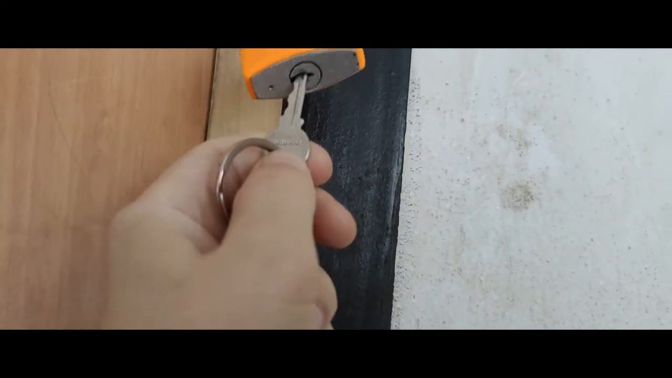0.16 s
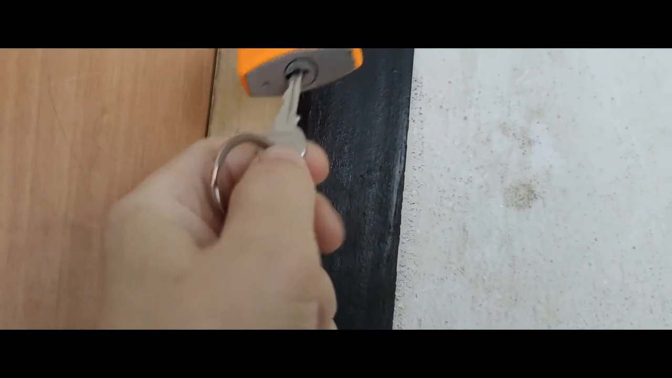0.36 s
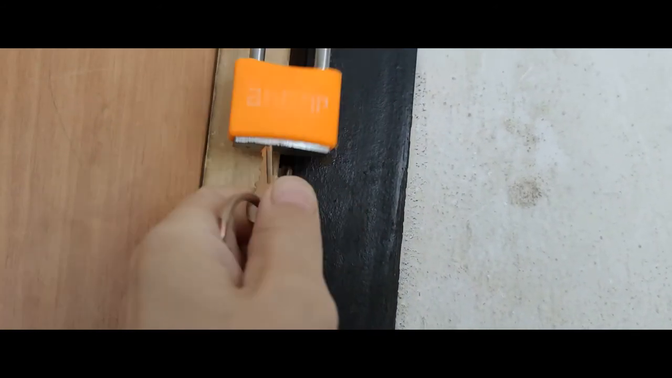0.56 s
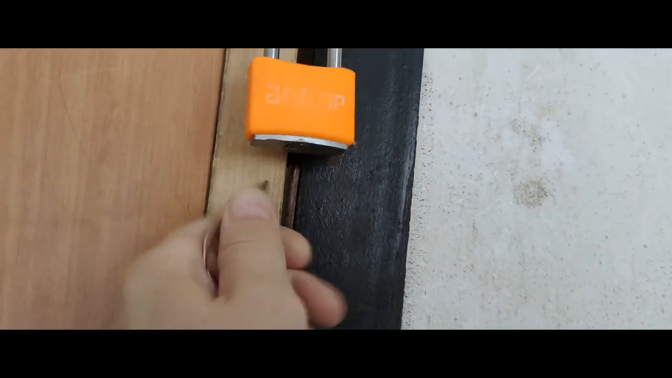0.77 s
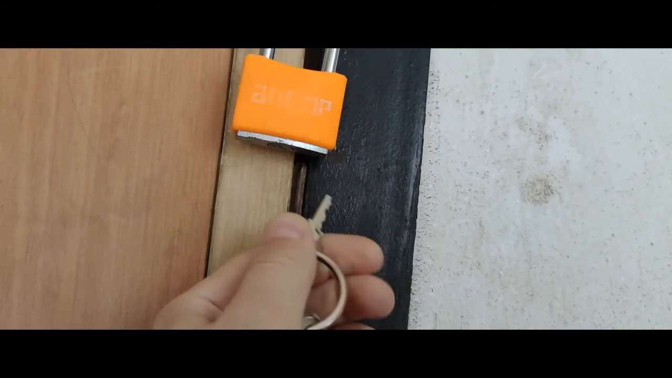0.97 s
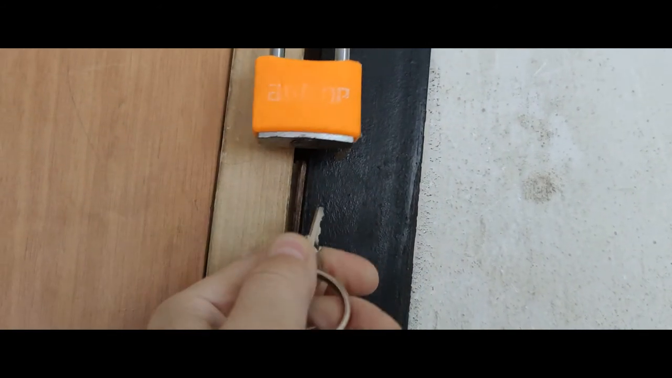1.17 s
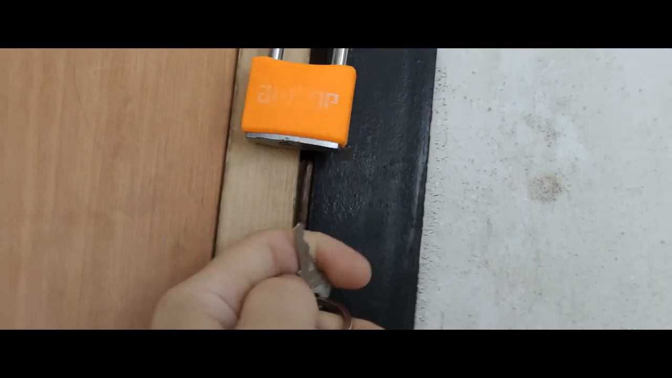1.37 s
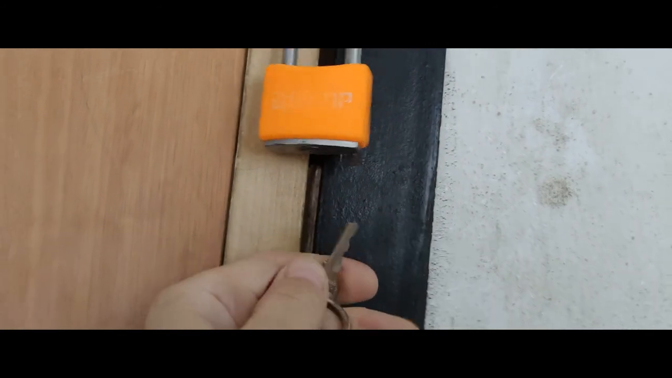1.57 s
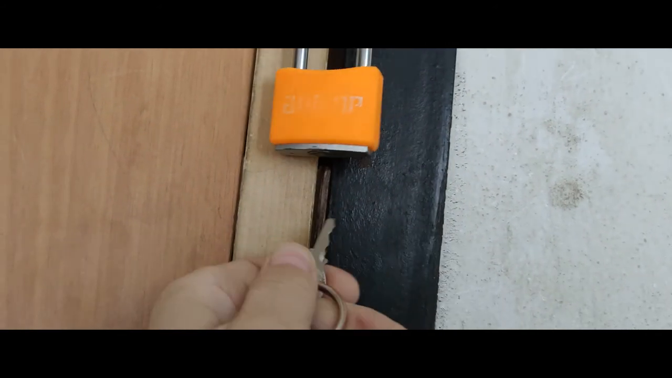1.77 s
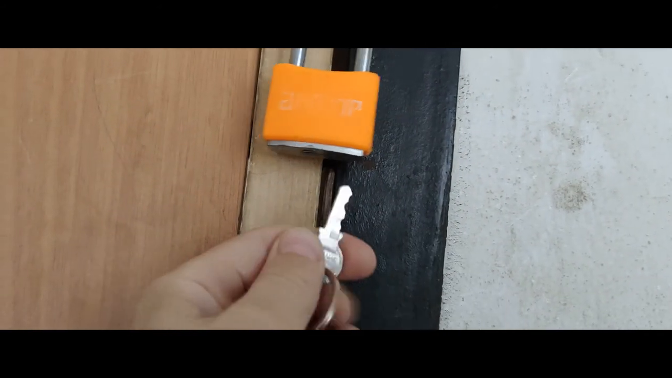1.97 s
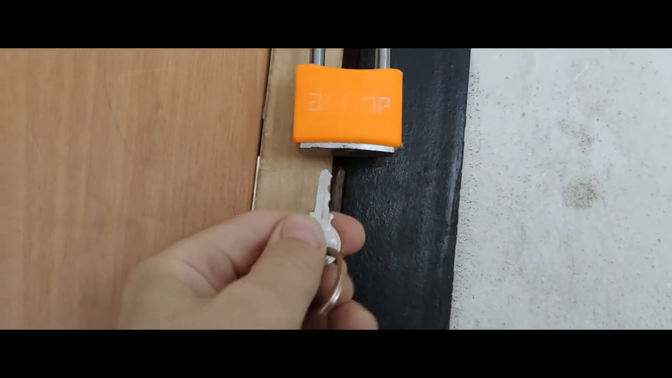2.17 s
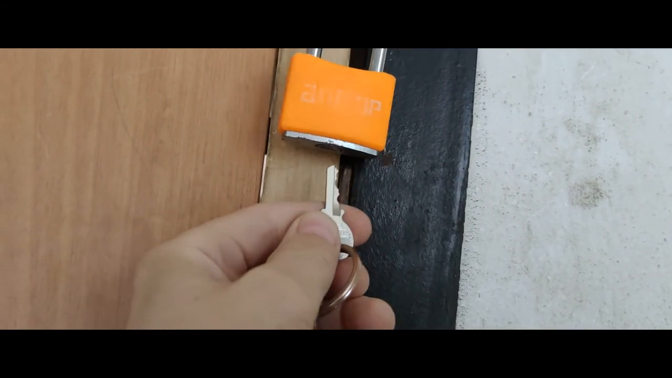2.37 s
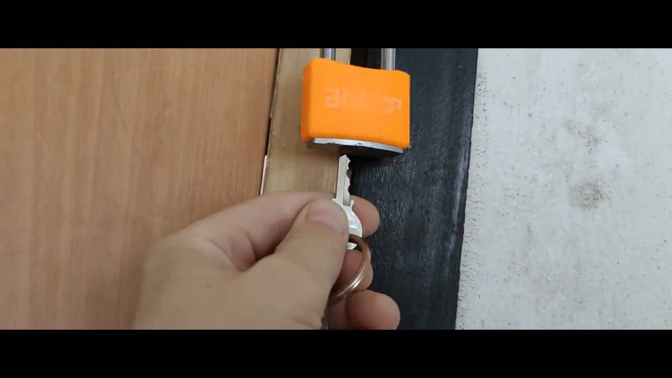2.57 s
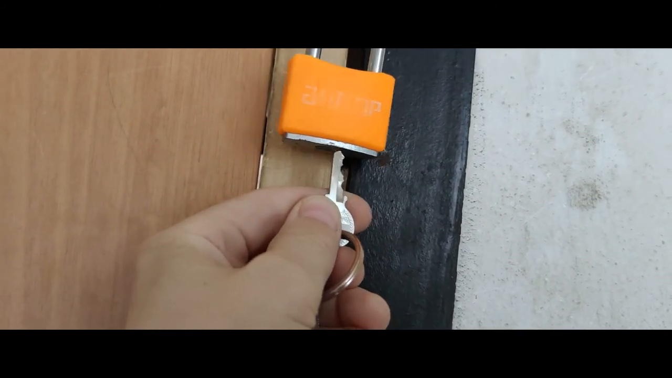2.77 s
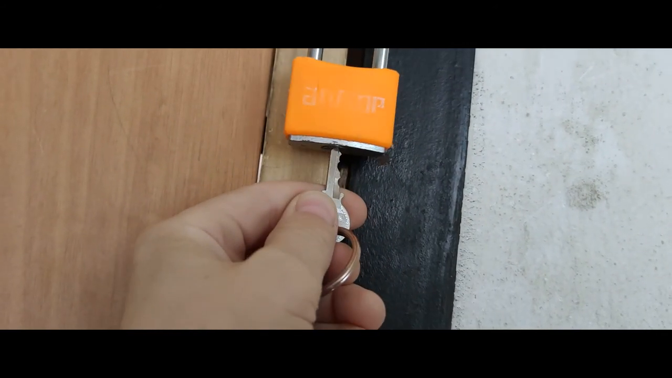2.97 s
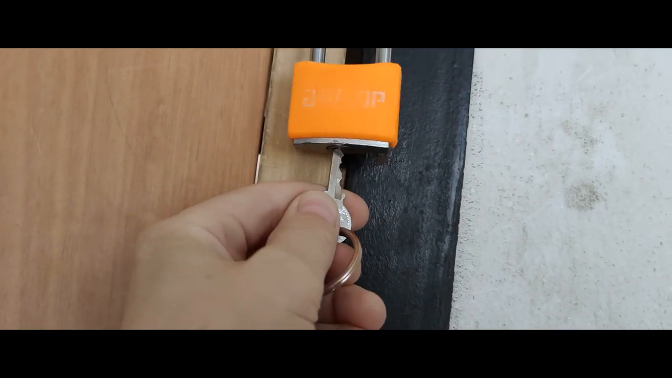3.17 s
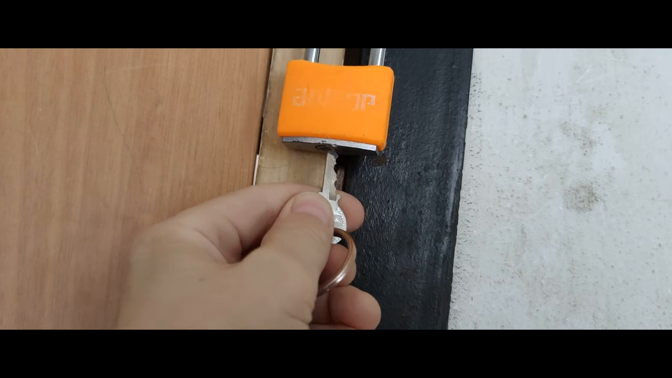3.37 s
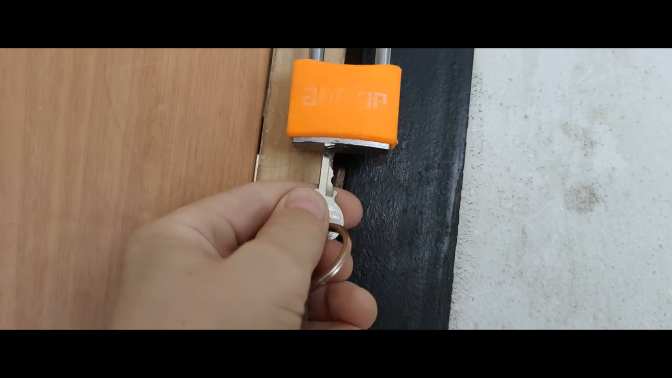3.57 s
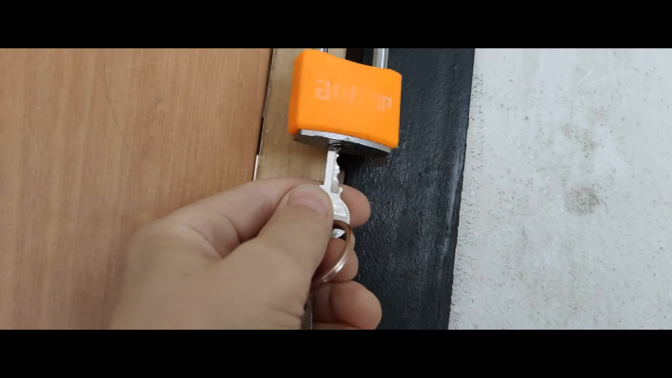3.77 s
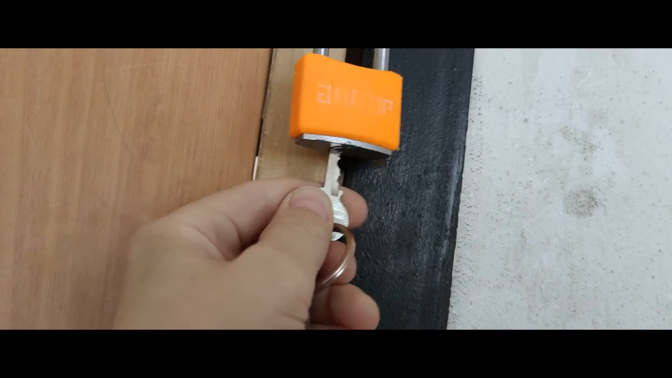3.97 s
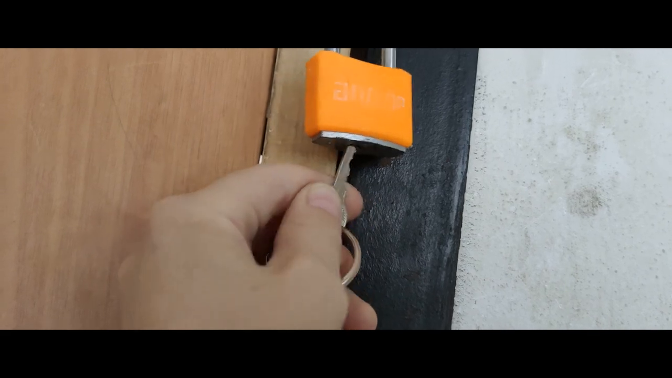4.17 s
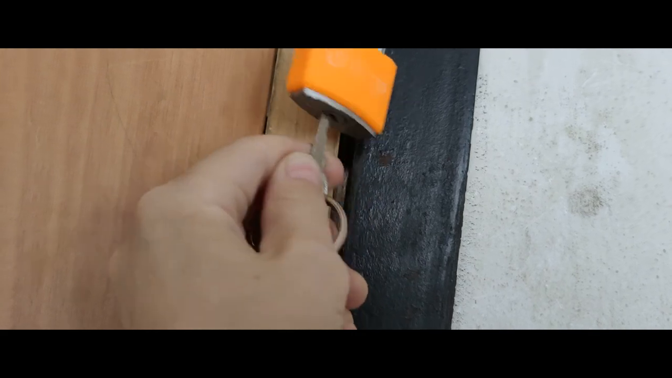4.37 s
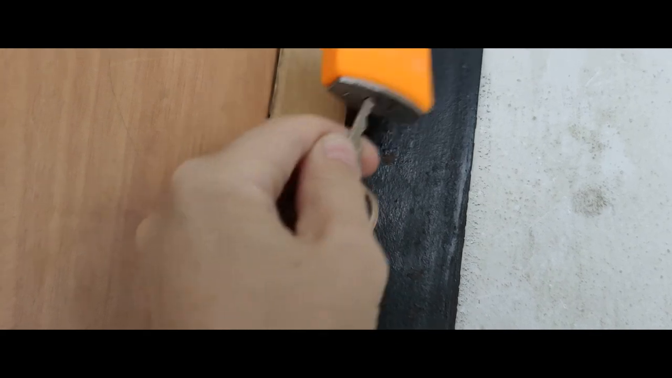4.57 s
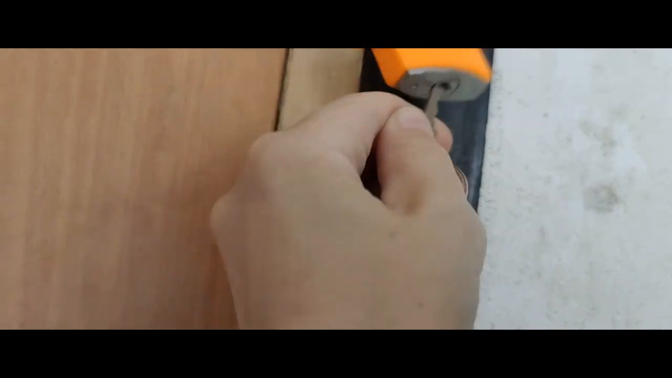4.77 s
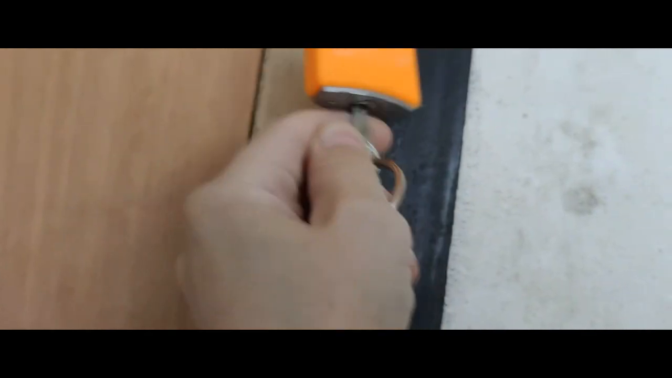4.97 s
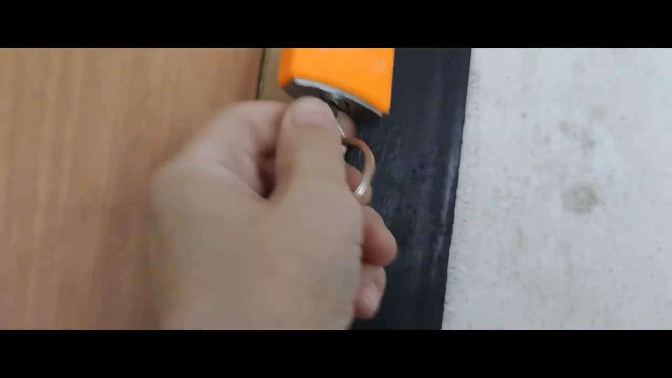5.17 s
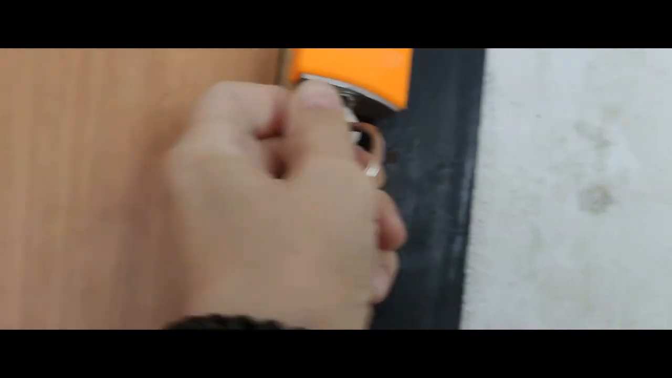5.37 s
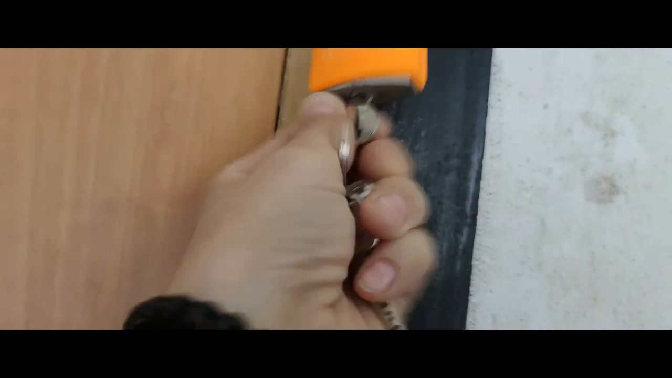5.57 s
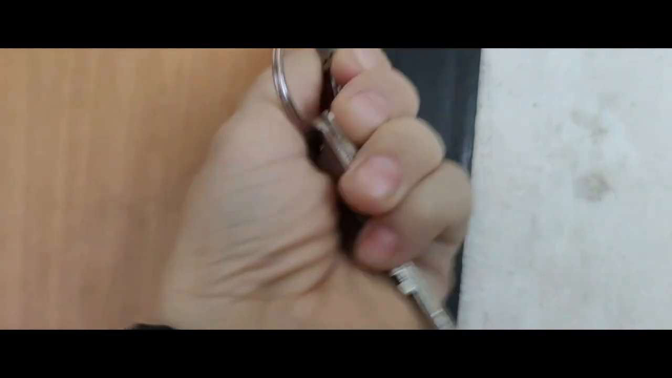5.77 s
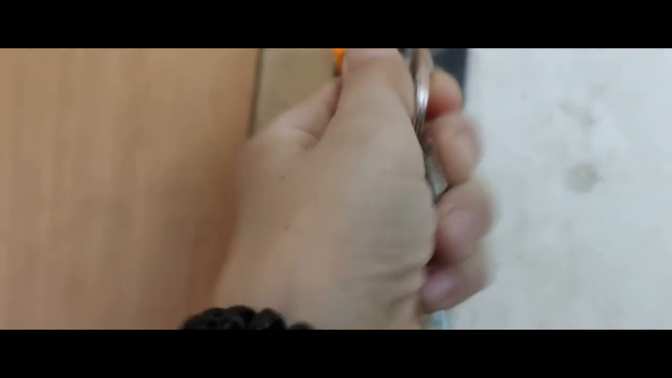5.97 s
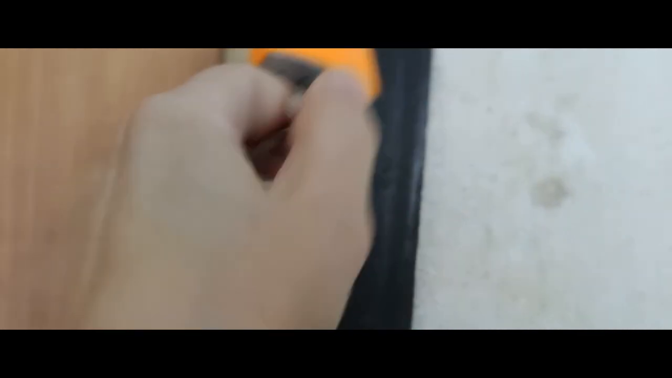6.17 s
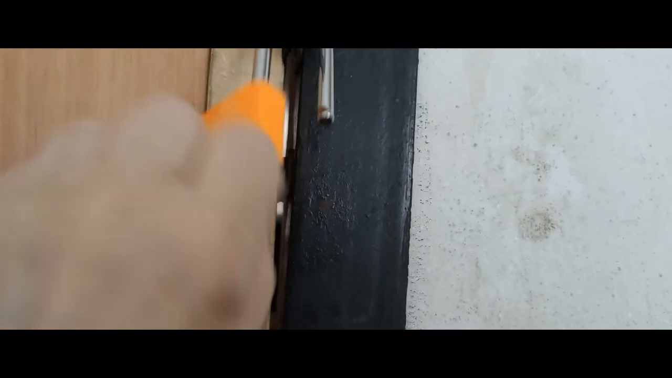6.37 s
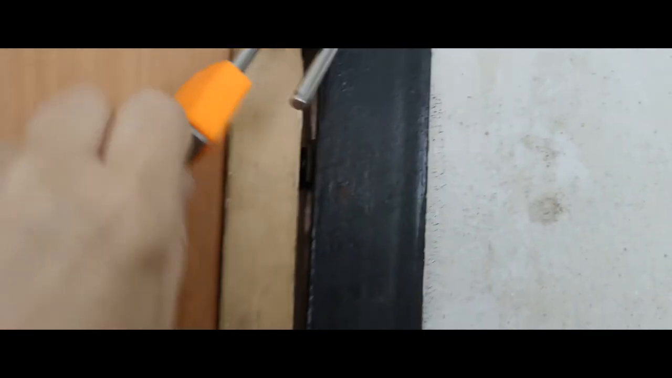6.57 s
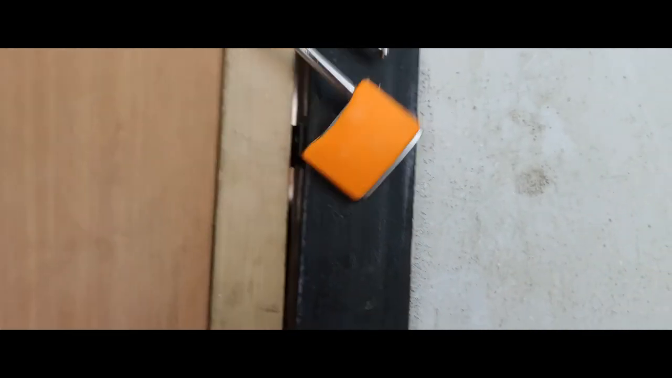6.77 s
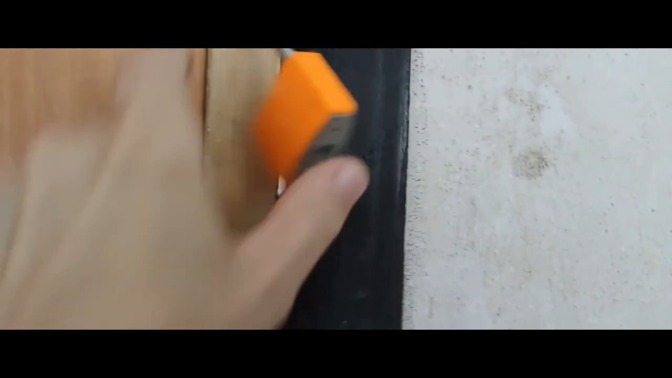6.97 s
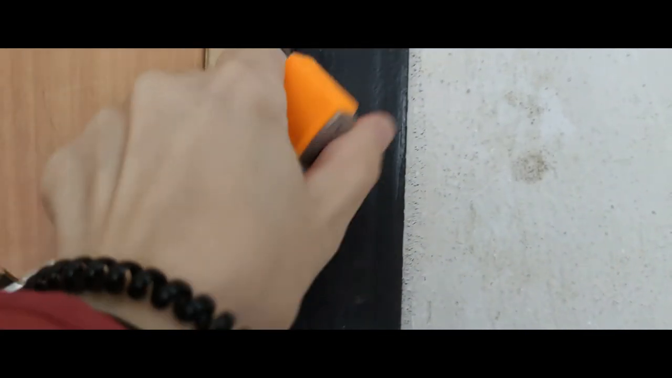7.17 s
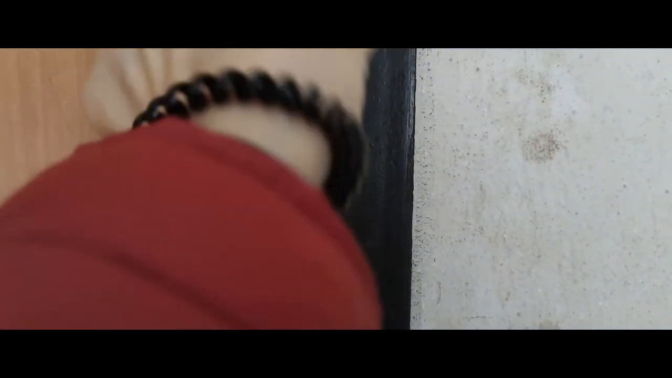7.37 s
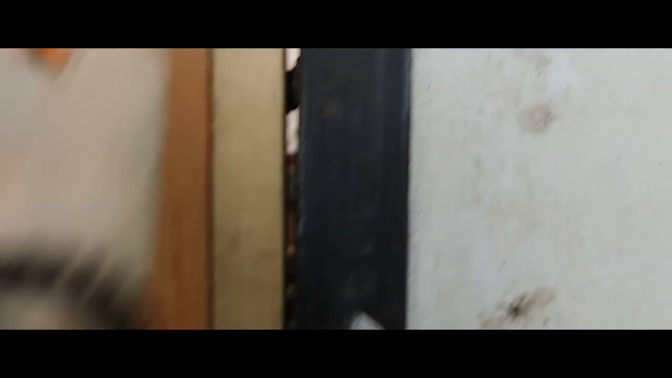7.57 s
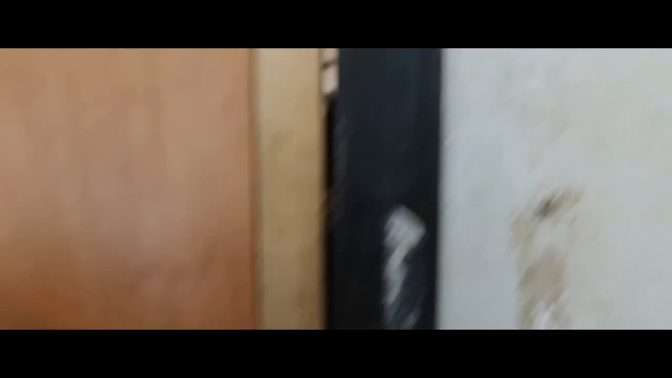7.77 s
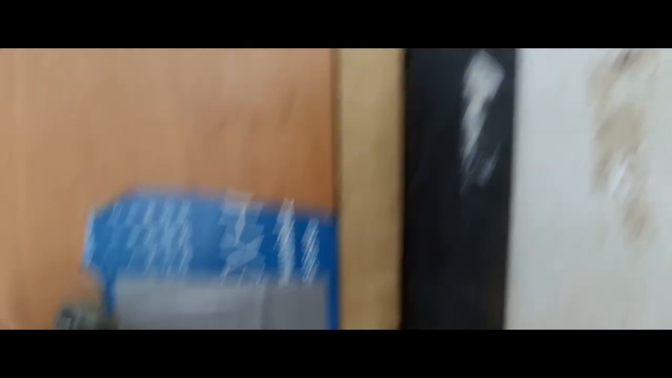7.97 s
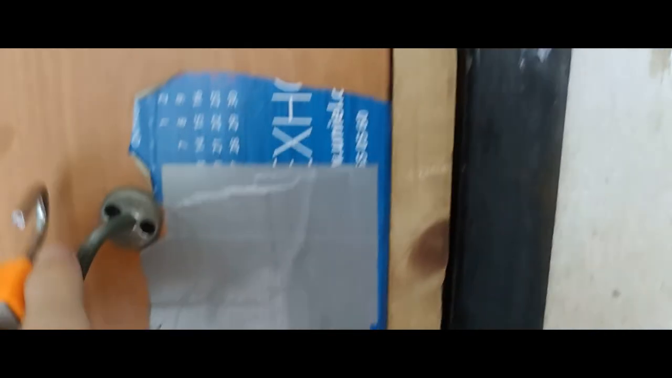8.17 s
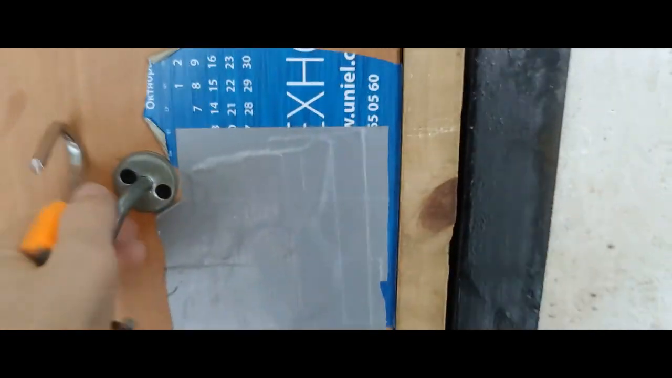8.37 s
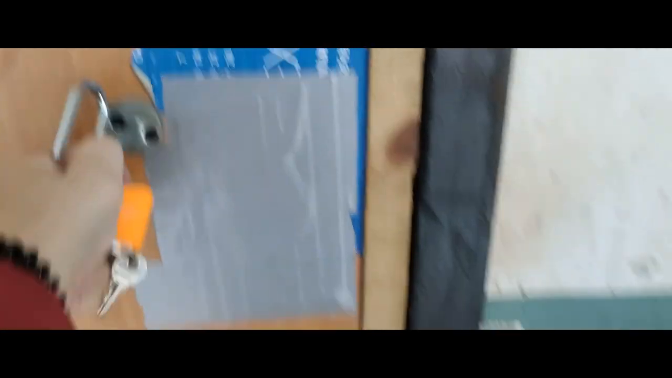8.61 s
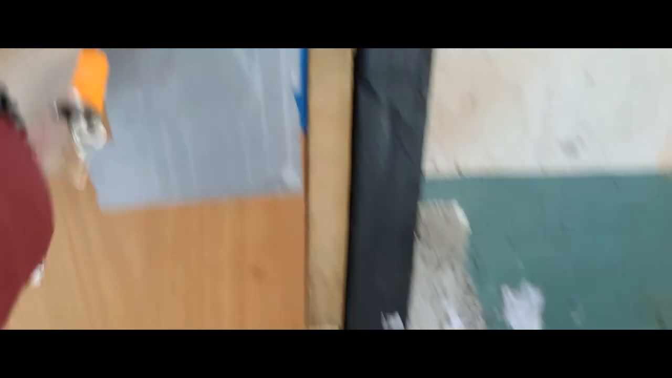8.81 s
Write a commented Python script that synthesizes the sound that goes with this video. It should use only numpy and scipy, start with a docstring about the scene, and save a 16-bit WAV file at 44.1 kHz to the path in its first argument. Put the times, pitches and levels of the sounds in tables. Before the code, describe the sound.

A key jingles on its ring while fumbled into a padlock, which clacks open and knocks a wooden door over low rumble.

```python
"""A key tinkles on its ring as a hand fumbles it into a padlock on a wooden door, opens it and lifts it off.
Key and steel are noise ticks with struck modes; door blows ring panel modes under a soft low boom.
Uneven slips of noise scrape key, lock and panel, and single resonances squeak. A hard-walled hall rings on
over a low building rumble and hiss. A phone close by rounds the peaks and cuts the top."""
import sys
import numpy as np
from scipy import signal
from scipy.fft import rfft, irfft
from scipy.io import wavfile
from scipy.ndimage import uniform_filter1d

SR = 44100
rng = np.random.default_rng(int(sys.argv[2]) if len(sys.argv) > 2 else 0)


def wav_out(sig):
    """Save sig, one row per channel (or a flat mono array), as 16-bit PCM at SR to the path in sys.argv[1]."""
    wavfile.write(sys.argv[1], SR, np.round(np.clip(np.atleast_2d(sig).T, -1, 1) * 32767).astype(np.int16))


N = 389888  # samples


def undb(db):
    """Decibels to amplitude."""
    return 10 ** (np.asarray(db) / 20)


def unit(x):
    """Scale to rms 1."""
    return x / np.sqrt(np.mean(x ** 2))


def curve(table):
    """Columns of a table of (time_s, value, ..), interpolated at every sample."""
    s, *columns = np.transpose(table)
    return [np.interp(np.arange(N) / SR, s, column) for column in columns]


def noise(lo_hz, hi_hz):
    """Band noise of rms 1."""
    edges_hz = [lo_hz, min(hi_hz, 0.45 * SR)]
    sos = signal.butter(2, edges_hz, "bandpass", fs=SR, output="sos")
    return unit(signal.sosfilt(sos, rng.standard_normal(N)))


def train(times, sizes):
    """Impulses at the given times."""
    return np.bincount((times * SR).astype(int), sizes, N)[:N]


def ring(x, hz, t60):
    """One mode, a two-pole resonator: an impulse of 1 starts a fading sine of height 1."""
    radius = np.exp(-np.log(1000) / (t60 * SR))
    w = 2 * np.pi * hz / SR
    return signal.lfilter([0, np.sin(w)], [1, -2 * radius * np.cos(w), radius * radius], x)


def strike(modes, times, db, lead_hz, scatter_db=3, sustain=1.0, detune=0.004,
           bounce_s=0.006063, lead_db=9):
    """Blows on a set of modes: each favours one mode, shifts pitch and fading, beats and bounces twice."""
    hz, gain_db, t60 = (column[:, None] for column in np.transpose(modes))
    chance = rng.standard_normal((len(times), 5, len(modes), 1))
    t = np.arange(int(0.94 * np.max(sustain) * t60.max() * SR)) / SR
    out = np.zeros(N + 2 * SR)
    sustains = sustain + 0 * times
    for s, level_db, lead, free, draws in zip(times, db, lead_hz, sustains, chance):
        level_draw, fade_draw, pitch_draw, late_draw, beat_draw = draws
        favour = np.exp(-(np.log(hz / lead) / 0.075) ** 2)
        size = undb(level_db + gain_db + scatter_db * level_draw + lead_db * favour)
        fade = undb(-60 * t / (t60 * free * np.exp(0.14 * fade_draw)))
        # the beat of a close pair of modes
        beat = 1 + 0.67 * np.cos(2 * np.pi * (hz * detune * beat_draw * t + late_draw))
        tone = np.sin(2 * np.pi * hz * (1 + detune * pitch_draw) * t)
        blow = np.sum(size * fade * beat * tone, axis=0)
        delays = bounce_s * np.cumsum(np.abs(late_draw[:3, 0]) * [0, 1, 1])
        for late, share in zip(delays, (1, 0.6, 0.35)):
            i = int((s + late) * SR)
            out[i:i + len(t)] += share * blow
    return out[:N]


def crack(times, db, t60, lo_hz, hi_hz, rise_s=0.0006):
    """A burst of band noise that swells quickly, bounces once and fades."""
    chance = rng.random((len(times), 2))
    hits = train(times, undb(db))
    hits = hits + train(times + 0.00063 + 0.0163 * chance[:, 0], undb(db - 24 * chance[:, 1] - 4.0))
    fade = signal.lfilter([1], [1, -np.exp(-np.log(1000) / (t60 * SR))], hits)
    return uniform_filter1d(fade, max(int(rise_s * SR), 1)) * noise(lo_hz, hi_hz)


# key against its ring: start_s, level_db (before each layer's trim), ring_db (against the tick), lead_hz
KEY_HITS = [(0.539, -32.5, -5, 3190), (0.9003, -42.5, 3, 4700), (0.9196, -27.5, -4, 4770),
            (0.9392, -30.5, -4.5, 4800), (1.1413, -39, -13.5, 2580), (1.2506, -36, -7.5, 4720),
            (1.369, -48, -6, 4720), (1.404, -40, -11, 2850), (1.4323, -35, -8.5, 2580),
            (1.44, -40, -10, 4720), (1.4556, -35.5, -8.5, 4660), (1.4989, -25.5, -12, 2580),
            (1.523, -41, -13, 2580), (1.63, -42, -9, 4720), (1.8443, -39.5, -14, 4770),
            (2.0197, -34.5, -5, 12300), (2.0426, -41, 7, 4650), (2.0497, -32.5, -0.5, 12400),
            (2.0655, -17, -25, 12400), (2.097, -29.5, 0, 12300), (2.176, -30, -2, 12400),
            (2.184, -53, -8, 11600), (2.48, -47, -7, 4720), (3.3377, -42.5, -6.5, 2570),
            (3.7474, -47, -4, 4720), (4.252, -37, -9, 2580), (4.258, -42, 0, 4720),
            (5.0586, -23, -11.5, 13000), (5.0836, -28, -7, 2830), (5.224, -24, -14.5, 5130),
            (5.4269, -17.5, -3.5, 14600), (5.466, -32.5, 4, 12400), (5.4954, -34, -1.5, 12600),
            (5.513, -34, -5.5, 12500), (5.5715, -37.5, -3.5, 2820), (5.6295, -27, -7.5, 8200),
            (5.7385, -15.5, -11, 8100), (5.834, -23.5, -9.5, 4550), (6.0266, -31.5, -4.5, 2920),
            (6.1062, -20, -12, 7900), (6.136, -34, -3.5, 4700), (6.2377, -17.5, -8, 8200),
            (6.2505, -19.5, -21, 4740), (6.39, -12, -3, 10200), (6.5994, -42, -7, 11900),
            (6.6298, -42, -6, 11300), (6.7008, -9.5, -14, 11600), (6.9417, -20, 0, 4660),
            (6.9847, -29, -0.5, 4900), (7.434, -33, -14, 4740), (7.719, -41.5, 0, 4750),
            (7.77, -32.5, -4, 4900), (7.8056, -7.5, -18.5, 2570), (7.82, -19, -3, 14000),
            (7.8737, -13.5, -20, 4730), (7.9377, -21, -18, 8000), (8.5467, -31, -7, 7900),
            (8.563, -14, -5.5, 7900)]
# resonances of the key: pitch_hz, level_db (relative), fade_s (t60, before the grip scales it)
KEY_MODES = [(2580, -3, .06), (2850, -7, .04), (4720, -2, .045), (5050, -8, .05), (5820, -14, .1),
             (7900, -4, .11), (8420, -14, .12), (10200, -8, .11), (11130, -10, .15), (11800, -14, .07),
             (12320, -11, .1), (12800, -17, .07), (14050, -5, .12)]
# the freely hanging key is set singing: start_s, level_db (of the first mode), fade_s (t60)
KEY_SINGING = [(6.945, -54, .9), (7.29, -62, 1.1), (7.525, -58, .55), (7.82, -57, .6), (8.22, -70, 4),
               (8.58, -60, 1.7)]
# the two modes that sing: pitch_hz
SINGING_MODES = [14126, 14503]


def key():
    """Short bright ticks that ring the key's modes; hanging free, two high modes sing on."""
    s, level_db, ring_db, lead_hz = np.transpose(KEY_HITS)
    # a blow that wakes a high mode is brighter all over: 4 dB per octave about 6500 Hz
    tilt_db = 4 * np.log2(lead_hz / 6500)
    ticks = crack(s, level_db - 25 - 1.24 * tilt_db, 0.027, 3600, 5700)
    ticks = ticks + crack(s, level_db - 31 + 0.5 * tilt_db, 0.041, 6800, 15000)

    octaves = np.log2(np.array(KEY_MODES)[:, :1] / 6500)
    # a key that rings louder is held more loosely and rings longer
    free = np.clip(0.8 * undb(0.9 * ring_db), 0.15, 0.8)
    blows_db = [d + tilt * octaves for d, tilt in zip(level_db + ring_db - 16, tilt_db)]
    rings = strike(KEY_MODES, s, blows_db, lead_hz, scatter_db=3.5, sustain=free, detune=0.005, lead_db=7)

    sing = sum(share * unit(ring(rng.standard_normal(N), hz, 0.2))
               for hz, share in zip(SINGING_MODES, (1, 0.5)))
    t = np.arange(N) / SR
    swing = sum((t > start) * undb(db - 60 * np.maximum(t - start, 0) / t60)
                for start, db, t60 in KEY_SINGING)
    return ticks + rings + swing * sing


# lock, shackle and hasp: start_s, mid_db, low_db, treble_db (levels before each layer's trim)
LOCK_HITS = [(0.46, -59, -49, -64), (0.516, -39, -58, -61), (0.638, -49, -58, -54),
             (0.7131, -25.5, -33, -35.5), (0.7339, -35, -31, -64), (2.932, -66, -49, -77),
             (3.8297, -39.5, -42, -48), (4.117, -48.5, -50, -78), (4.601, -48, -61, -75),
             (4.6629, -28.5, -28, -26), (4.6994, -41, -42, -49), (5.0992, -19.5, -24.5, -32),
             (5.1167, -32, -35, -39), (5.28, -43, -49, -53), (5.3115, -37, -59, -68),
             (5.4125, -37, -40, -37), (5.4231, -24, -24.5, -38), (5.6758, -23, -61, -30),
             (5.7034, -25, -37.5, -52), (6.0751, -30.5, -35, -47), (6.1788, -36.5, -37.5, -57),
             (6.364, -37, -65, -36), (6.3879, -24, -19, -8.5), (6.3974, -15.5, -33, -19),
             (6.457, -39, -42, -28), (6.493, -21.5, -38, -32), (6.553, -26.5, -34, -39.5),
             (6.658, -22.5, -35, -17.5), (6.798, -34, -37, -53), (6.817, -21.5, -22, -38),
             (7.0288, -30, -26.5, -38), (7.0603, -36, -38, -25.5), (7.2494, -20.5, -41, -34),
             (7.2852, -17.5, -32.5, -16), (7.5207, -28.5, -20, -24.5), (8.1333, -36, -27.5, -57),
             (8.15, -24, -24.5, -65), (8.3761, -29.5, -26, -70), (8.46, -14, -10.5, -30),
             (8.4922, -12.5, -12.5, -31), (8.5737, -17, -14, -35), (8.6077, -34, -23, -33),
             (8.639, -51, -50, -32), (8.6974, -30.5, -34, -38)]
# resonances of the lock steel: pitch_hz, level_db (relative), fade_s (t60, shortened in use)
STEEL_MODES = [(1330, 3.5, 0.1), (2060, -47, 0.13), (3400, -1.5, 0.013), (4630, -17, 0.097),
               (4800, -10, 0.069), (6200, -44, .06), (7800, 5, 0.071), (8600, -6, 0.28),
               (10600, -44, 0.067), (12200, -41, 0.072), (15300, -8, .06)]


def lock():
    """Clacks of body, shackle and hasp: three noise bands, a short negative pulse and steel modes."""
    s, mid_db, low_db, top_db = np.transpose(LOCK_HITS)
    lead_hz = 2000 * 2 ** (2.53 * rng.random(len(s)))  # each blow lands somewhere else
    clack = crack(s, mid_db - 10.0, 0.05, 2230, 4520)
    clack = clack + crack(s, low_db - 12.0, 0.047, 300, 1360)
    clack = clack + crack(s, top_db - 4.0, 0.019, 2670, 11800)
    # each clack starts with a suction pulse
    pulse = np.convolve(train(s, -undb(low_db - 5.5)), np.hanning(int(0.0004 * SR)))[:N]
    # each mode takes the level that the blow has at its pitch
    pitch = np.log(np.array(STEEL_MODES)[:, :1])
    anchors = np.log([1400, 3500, 8000])
    blows_db = [np.interp(pitch, anchors, levels) - 16 for levels in zip(low_db, mid_db, top_db)]
    rings = strike(STEEL_MODES, s, blows_db, lead_hz, sustain=0.35, detune=0.007, bounce_s=0.004, lead_db=6)
    return clack + pulse + rings


# blows on the door: start_s, panel_db, boom_db (levels before each layer's trim), lead_hz
DOOR_HITS = [(0.709, -23, -24.5, 267), (2.085, -44, -42.5, 445), (3.84, -43.5, -52, 410),
             (4.665, -31, -51, 406), (5.101, -33, -34, 249), (5.424, -35, -31, 324), (5.673, -35, -37, 252),
             (6.077, -38, -51, 354), (6.177, -43, -54, 307), (6.389, -30, -33, 340),
             (6.671, -39, -35.5, 378), (6.792, -41, -52, 371), (6.818, -29, -32, 470),
             (7.018, -23, -24, 259.3), (7.141, -37.5, -58, 262), (7.252, -32, -52, 384),
             (7.285, -32, -46, 387), (7.517, -21.5, -38, 295), (8.147, -27.5, -56, 445),
             (8.378, -34.5, -54, 445), (8.458, -16, -46, 454), (8.491, -31, -48, 443),
             (8.697, -32, -32, 354)]
# resonances of the door panel: pitch_hz, level_db (relative), fade_s (t60, shortened in use)
PANEL_MODES = [(177.6, -4.5, 0.18), (251.4, -4.5, 0.25), (309, -7.5, 0.19), (357.6, 0, 0.12),
               (377, -6, 0.28), (449, -2.5, 0.097), (493.3, -6.5, 0.2), (627, -14, 0.089), (720, -8, 0.063),
               (866, -15, 0.37)]
# resonances of the whole leaf: pitch_hz, level_db (relative), fade_s (t60)
LEAF_MODES = [(73.6, 1.7, 0.35), (97.2, 0.42, 0.6), (119, 2, 0.31)]


def door():
    """The panel knocks in modes and noise; the whole leaf booms a little later with a softened onset."""
    s, panel_db, boom_db, lead_hz = np.transpose(DOOR_HITS)
    knock = strike(PANEL_MODES, s + 0.0022, panel_db - 14.0, lead_hz, scatter_db=2.5, detune=0.03,
                   sustain=0.85, lead_db=10.5)
    knock = knock + crack(s + 0.00206, panel_db - 8, 0.15, 96, 510)
    boom = crack(s, boom_db, 0.39, 36.7, 160)
    boom = boom + strike(LEAF_MODES, s + 0.0128, boom_db - 2.5, 97 + 0 * s, detune=0.0232,
                         bounce_s=0.01376, lead_db=3.0)
    swell = np.hanning(int(0.011 * SR))
    return knock + np.convolve(boom, swell / swell.sum())[:N]


def edges(i):
    """Fade in over 2 ms and out over 16 ms across the sample numbers i."""
    return np.minimum(1, np.minimum((i - i[0]) / (0.002 * SR), (i[-1] - i) / (0.016 * SR)))


# metal sliding on metal and hand on door:
# start_s, end_s, first_db, last_db, treble_db, panel_db (the last two relative to the level)
RUB_STROKES = [(0, 0.265, -52, -89, -33, -3), (0.502, 0.586, -64.5, -57, -20, 4.5),
               (1.422, 1.552, -86, -74, -14, -22), (2.223, 2.28, -79, -80, 9, -15),
               (3.794, 3.89, -67.5, -75.5, -19, 5.5), (4.317, 4.483, -69, -70, -9, 9.5),
               (4.533, 4.586, -95, -59, -17, 12), (4.749, 4.969, -72, -81.5, -3, 20),
               (5.11, 5.318, -70.5, -73, -1, 12.5), (5.436, 5.528, -49, -80, 3, 0),
               (5.612, 5.987, -62, -79.5, -15, 8), (6.023, 6.219, -59, -60.5, -25, 4),
               (6.23, 6.303, -78, -71, -11, 19), (6.396, 6.69, -38.5, -54, -14, -2),
               (6.646, 6.772, -65.5, -49.5, -2.5, 8.5), (6.788, 6.896, -43.5, -61, -29, 5),
               (6.94, 7.134, -61, -62, 5.5, -14), (7.244, 7.476, -54.5, -55, -5.5, -11),
               (7.562, 7.654, -54.5, -62, -14, 17.5), (7.82, 7.886, -52, -69, 5, -18),
               (8.388, 8.466, -59, -62, -29, 13.5), (8.496, 8.67, -49, -45, -0.5, 0),
               (8.703, 8.795, -55, -63.5, -5, 7.5)]
# one resonance squeaks under pressure: start_s, end_s, level_db, pitch_hz, fade_s (t60)
SQUEAK_TONES = [(2.78, 3.2, -81, 2500, .06), (4.005, 4.12, -69, 3360, .06), (4.33, 4.47, -76, 1400, .02),
                (4.749, 4.967, -76, 2190, .03), (6.07, 6.2, -60, 3900, .008), (7.25, 7.4, -50, 2050, .026),
                (7.36, 7.47, -48, 4700, .008), (7.807, 7.886, -54, 4840, .03),
                (8.55, 8.671, -54, 7780, .01)]


def scrape():
    """Slips of uneven size over a finer hiss, in metal and door panel; now and then one resonance squeaks."""
    slip_sizes = undb(4 * np.minimum(rng.exponential(size=(4, N)), 4))
    slips = (rng.random((4, N)) < 300 / SR) * slip_sizes  # about 300 slips a second
    grain = [unit(0.12 + unit(signal.lfilter([1], [1, -0.988], v))) for v in slips]
    panel = unit(sum(undb(db) * ring(rng.standard_normal(N), hz, 0.46 * t60)
                     for hz, db, t60 in PANEL_MODES[1:]))
    # the steel answers in damped modes, driven by four streams of slips in turn
    steel = sum(undb(db) * unit(ring(grain[k % 4] * rng.standard_normal(N), hz, 0.14 * t60))
                for k, (hz, db, t60) in enumerate(STEEL_MODES[1:6]))
    middle = unit(steel) + 0.55 * grain[0] * noise(2100, 4500)
    treble = grain[1] * noise(4700, 11200)
    low = grain[2] * noise(706, 1130)
    layers = np.array([middle, treble, low, panel])

    out = np.zeros(N)
    hiss = grain[3] * rng.standard_normal(N)
    for start_s, end_s, first_db, last_db, top_db, panel_db in RUB_STROKES:
        i = np.arange(int(start_s * SR), int(end_s * SR))
        low_db = -11.5 + 0.85 * panel_db  # the more the wood takes part, the fuller the rub
        mix = undb([0, top_db, low_db, panel_db]) @ layers[:, i]
        out[i] += mix * undb(np.linspace(first_db, last_db, len(i))) * edges(i)
    for start_s, end_s, db, hz, t60 in SQUEAK_TONES:
        i = np.arange(int(start_s * SR), int(end_s * SR))
        out[i] += undb(db) * unit(ring(hiss[i], hz, t60)) * edges(i)
    return out


# the shackle springs open and jerks hand and phone: start_s, length_s, level_db
SHACKLE_JERK = (6.381, .03, -16)


def jolt():
    """One slow inward swing of the microphone: a single smooth negative pulse."""
    s, length_s, db = SHACKLE_JERK
    return np.convolve(train(np.array([s]), [-undb(db)]), np.hanning(int(length_s * SR)))[:N]


# bands of the hall's tail: pitch_hz, fade_s (t60), level_db (before the tail is scaled)
HALL_BANDS = [(143.4, 0.42, -14), (386, 0.55, -21), (944, 0.57, -21), (2320, 0.62, -17.5),
              (5400, 0.46, -16.5), (9600, 0.26, -10)]


def hall(x):
    """A diffuse tail of fading noise bands whose treble dies first."""
    t = np.arange(int(1.2 * SR)) / SR
    tail = sum(undb(db) * noise(hz / 1.78, hz * 1.46)[:len(t)] * undb(-60 * t / t60)
               for hz, t60, db in HALL_BANDS)
    onset = np.minimum(t / 0.012, 1)
    return signal.fftconvolve(x, tail * onset / np.sqrt(0.068 * SR))[:N]


# course of rumble and hiss: time_s, deep_db (level of the lowest room mode), low_db, hiss_db
BACKGROUND_LEVELS = [(0.0, -44, -42, -60.5), (0.44, -47, -46, -63), (0.91, -35.5, -38, -62),
                     (1.23, -41.5, -48.5, -63.5), (4.1, -42.5, -46, -63.5), (5.49, -39.5, -46.5, -60),
                     (6.4, -38.5, -42, -58), (7.09, -45, -39.5, -57), (7.56, -36, -40, -55),
                     (8.34, -42.5, -45, -58), (8.54, -31, -33, -53), (8.84, -34, -41, -57)]
# room modes of the rumble: pitch_hz, width_hz, level_db (relative)
ROOM_MODES = [(33.8, 11.3, -1.5), (71.2, 21.2, 5), (102.2, 32.6, -2), (121.7, 20.3, -2.5),
              (155.5, 23.7, -2), (178.5, 18, -8)]
# spectrum of the hiss: pitch_hz, density_db (relative, per Hz)
HISS_SPECTRUM = [(200, 4.5), (245, -6), (305, -1.5), (330, -15), (366, -4), (400, -10.5), (1040, -22.5),
                 (1400, -21), (1770, -33), (2420, -22), (3250, -24.5), (8100, -32.5), (13000, -33),
                 (16000, -25.5)]


def background():
    """Room modes shaken by distant machinery as narrow noise bands, over a smooth shaped hiss."""
    deep_db, low_db, hiss_db = curve(BACKGROUND_LEVELS)
    deep, *low = (undb(db) * noise(hz - width / 2, hz + width / 2) for hz, width, db in ROOM_MODES)
    hz, density_db = np.transpose(HISS_SPECTRUM)
    bins_hz = np.fft.rfftfreq(N, 1 / SR) + 1  # plus 1 Hz keeps the logarithm finite
    shape = undb(np.interp(np.log(bins_hz), np.log(hz), density_db, left=-90))
    air = irfft(rfft(rng.standard_normal(N)) * shape, N)
    return undb(deep_db) * deep + undb(low_db) * unit(sum(low)) + undb(hiss_db) * unit(air)


def scene():
    """Key, lock, door and scrapes sound direct and through the hall; jolt and background stay dry."""
    near = key() + lock() + door() + scrape()
    return (near + hall(near) + jolt() + background())[None]


def record(dry):
    """The phone rounds the loudest peaks and cuts the top above 15.8 kHz."""
    rounded = np.tanh(1.5 * dry) / 1.5
    return signal.sosfilt(signal.ellip(10, 0.2, 60, 15800, fs=SR, output="sos"), rounded)


dry = scene()
out = record(dry)
wav_out(out)
```